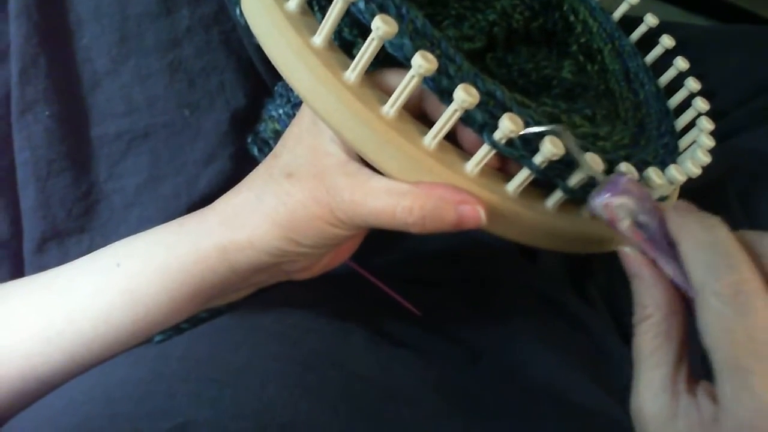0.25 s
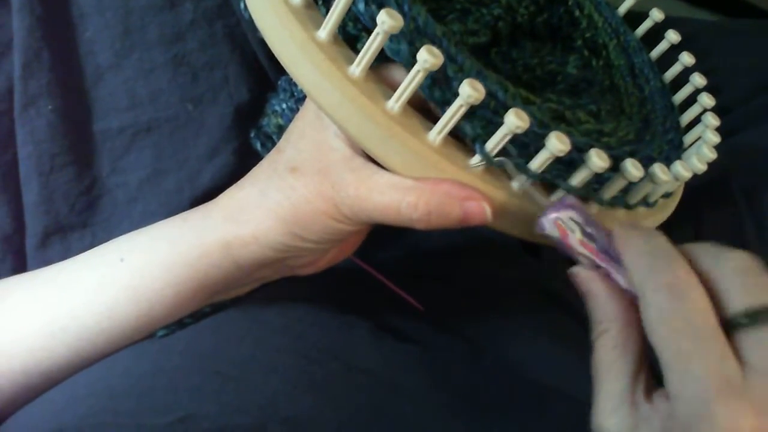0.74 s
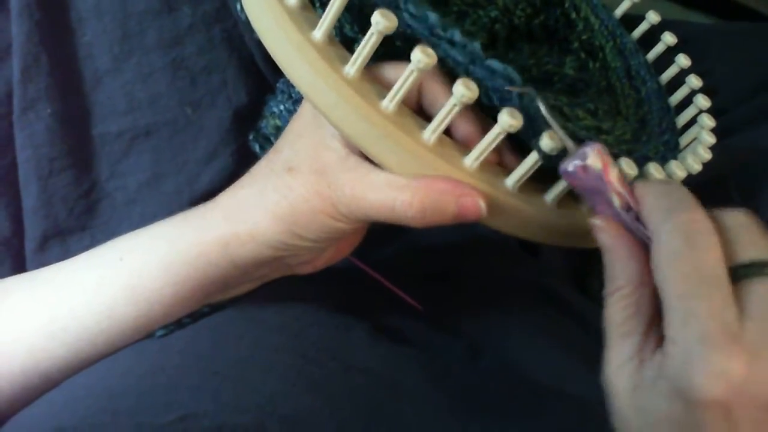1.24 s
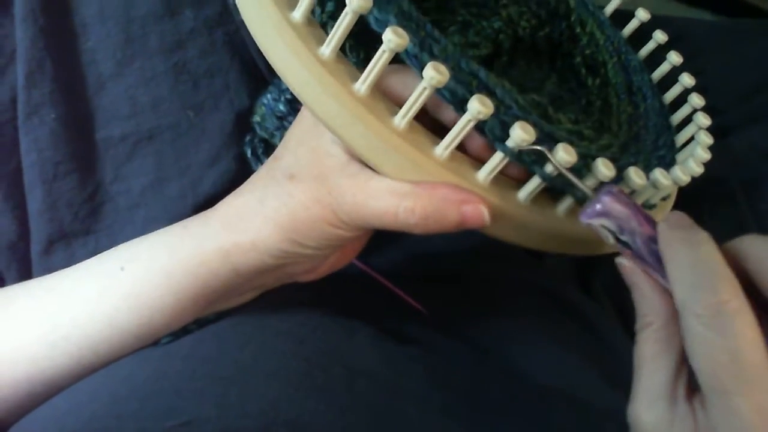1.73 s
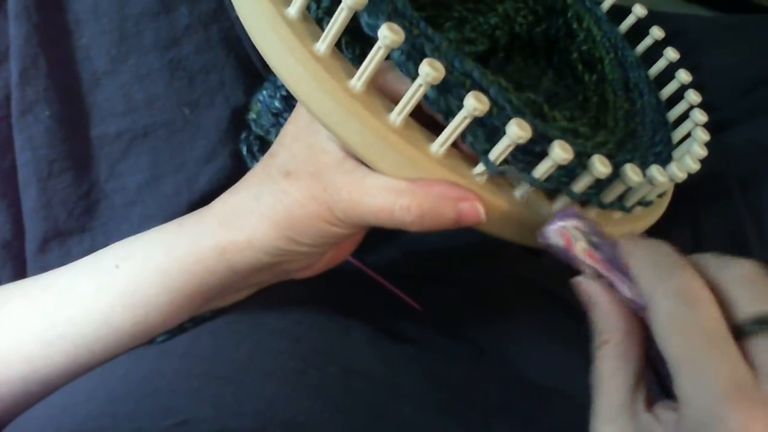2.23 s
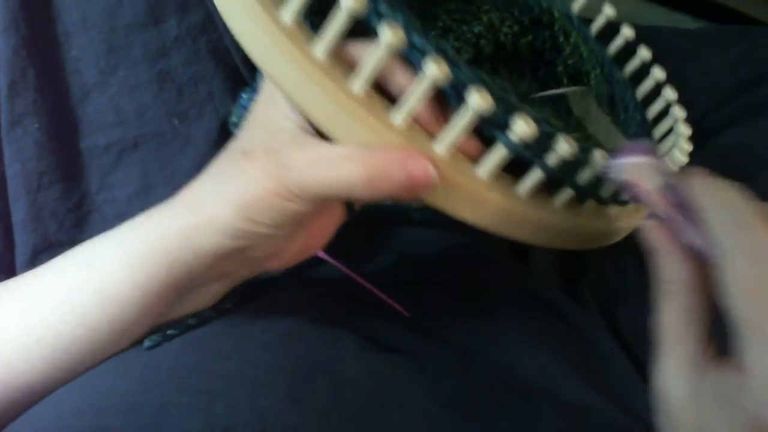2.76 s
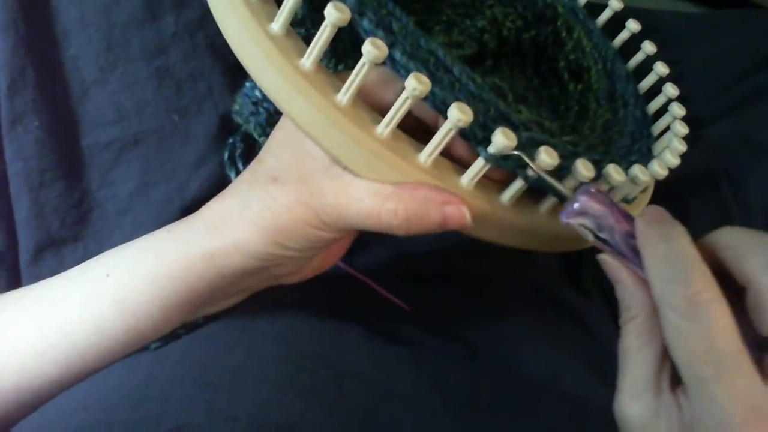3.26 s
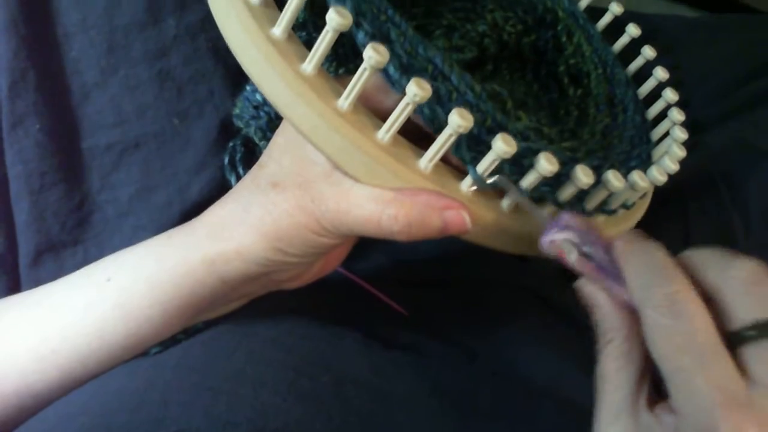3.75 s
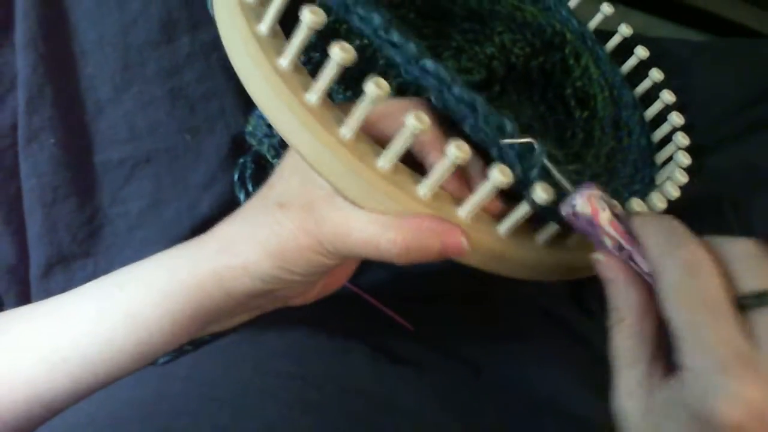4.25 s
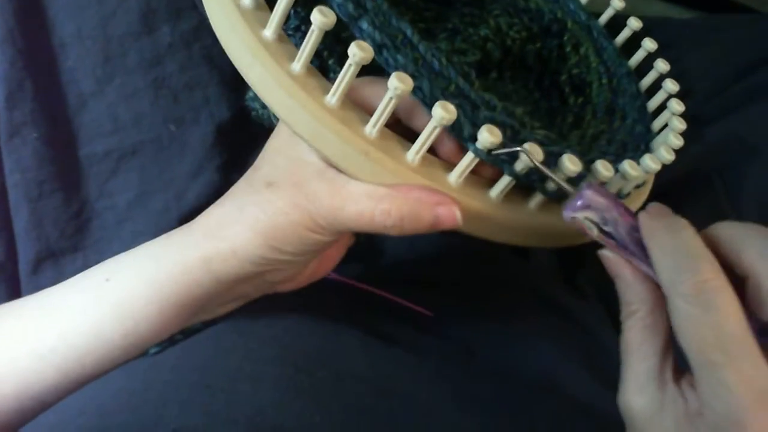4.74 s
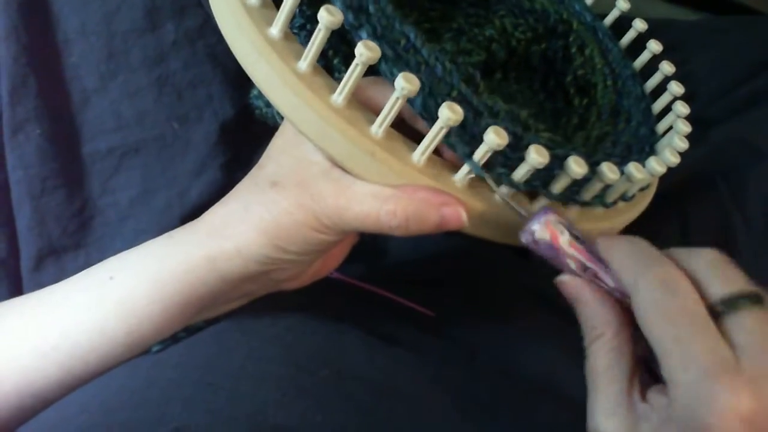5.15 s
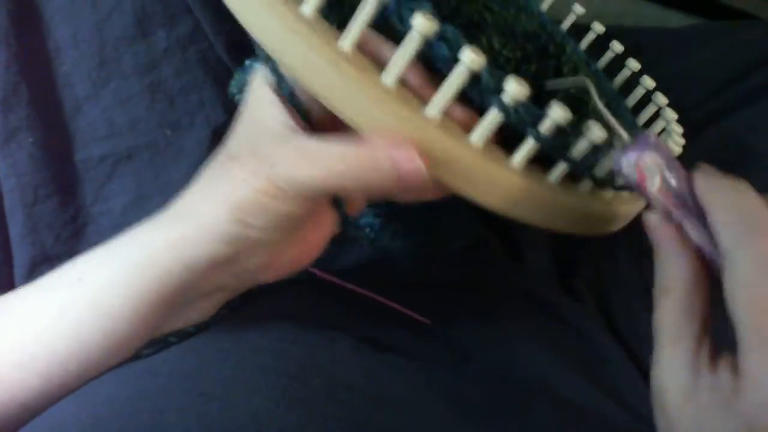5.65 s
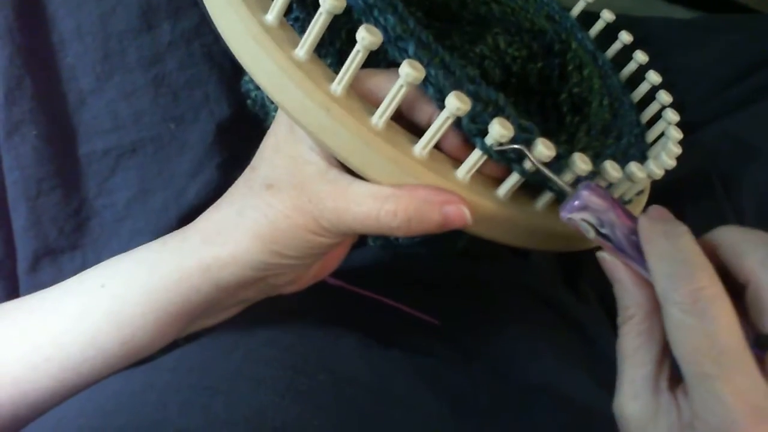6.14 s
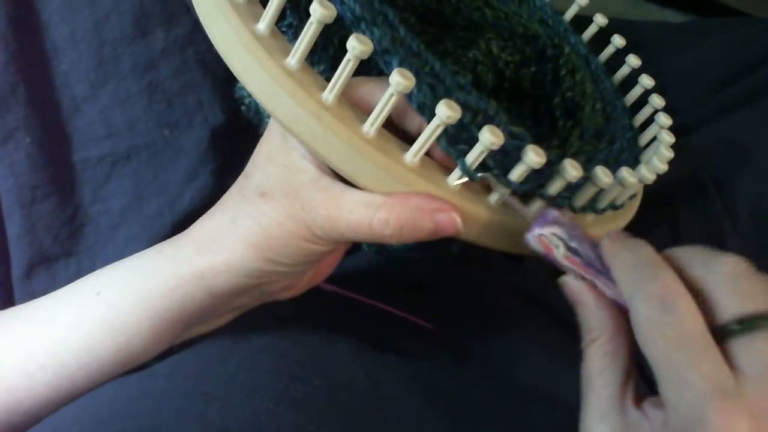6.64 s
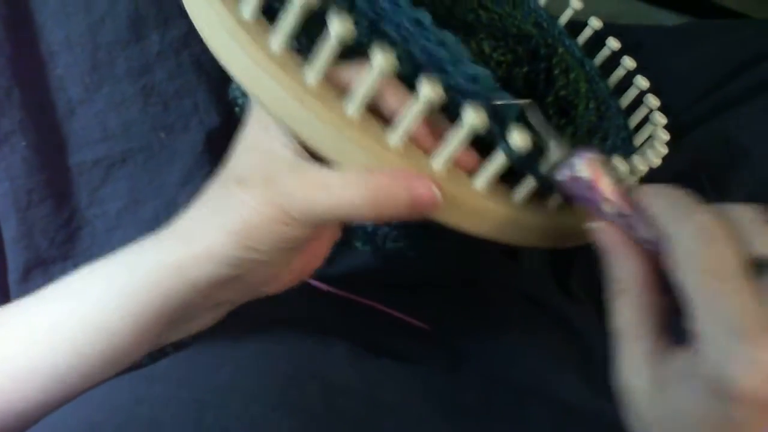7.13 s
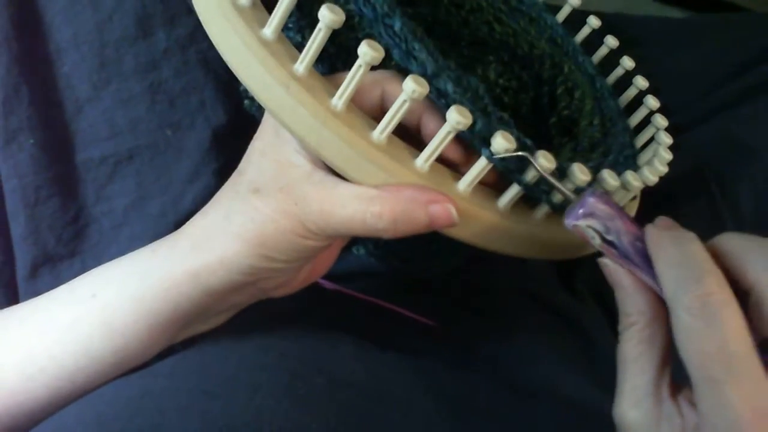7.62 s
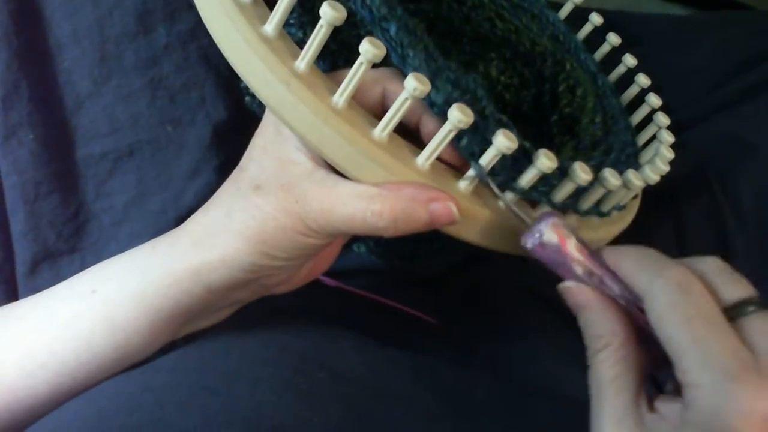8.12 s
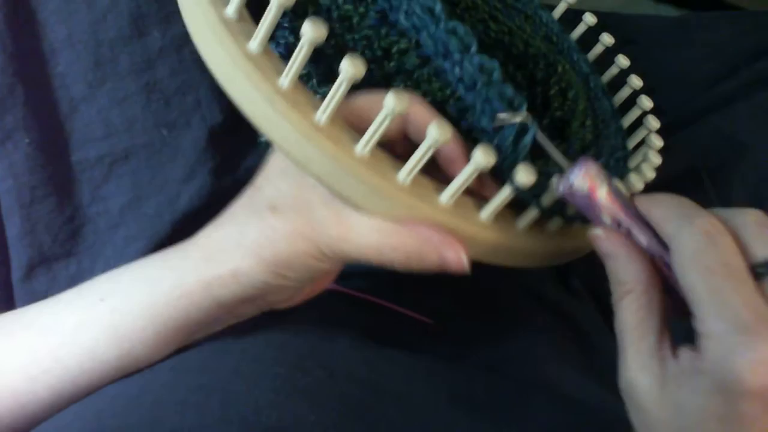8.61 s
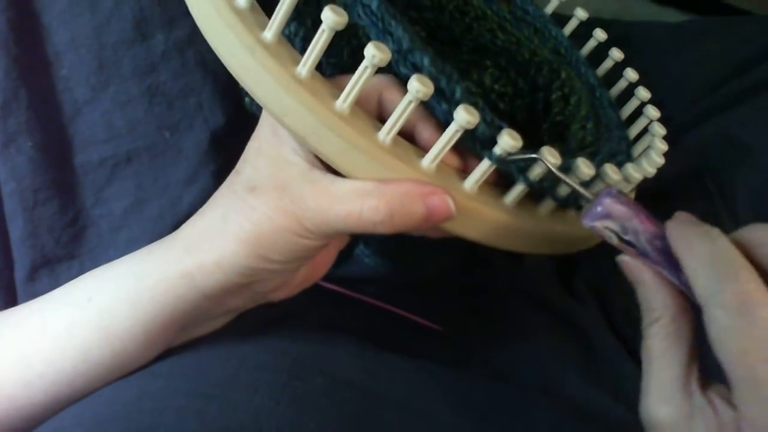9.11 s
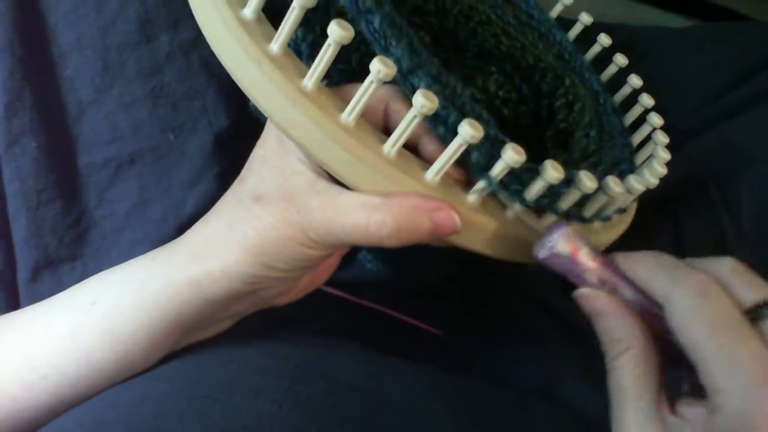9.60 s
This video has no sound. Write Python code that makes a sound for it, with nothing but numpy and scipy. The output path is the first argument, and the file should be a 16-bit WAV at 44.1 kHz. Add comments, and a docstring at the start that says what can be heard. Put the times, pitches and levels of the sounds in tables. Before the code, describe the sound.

A quiet, dry indoor space, heard close up with a small microphone. A thin faint motor whine wavers steadily over low mains-like hum, rumble and light hiss throughout. A metal hook works the pegs of a round loom: scratchy slides from 0.5 s with a sharp click at 0.7, then a tight cluster of clicks at 1.25-1.3 and soft fabric brushing until 1.5. Gentler scraping runs from 1.9 to 2.7, with brushing near 2.7-2.9. Small ticks follow, firmer at 3.55 and 3.77, more grit to 4.2, and a yarn swish at 4.3-4.5. Scrapes resume at 4.8-5.4, ending in a woody click at 5.43 and another brush. Light ticks lead to a hard knock at 7.0 and a rustle. Scratching at 7.7-8.4, brushing around 8.5, a strong click at 8.86, more rustle, then the loudest snap at 9.46 and final small scrapes.

```python
"""On a lap, close to a small microphone: a metal hook taps and scrapes the pegs of a round knitting loom.
Chattering blows and grainy strokes set hook, pegs and loom ring sounding; the room adds a short tail.
Knitted fabric brushes, as filtered noise, when each loop is lifted over; the loom frame knocks dully.
Behind it a small motor whines in drifting harmonics, over wavering mains hum, room rumble and hiss."""
import sys
import numpy as np
from scipy import signal
from scipy.fft import rfft, irfft, next_fast_len
from scipy.io import wavfile
from scipy.ndimage import uniform_filter1d

SR = 44100
rng = np.random.default_rng(int(sys.argv[2]) if len(sys.argv) > 2 else 0)


def transcribe(u):
    """Save the signal u as a 16-bit wav file named by the first command-line argument.

    u: samples, shape (n,) or (channels, n), limited to [-1, 1]; the rate is SR.
    q: integer samples, one column per channel.
    """
    v = np.clip(np.atleast_2d(u).T, -1, 1)
    q = np.round(v * 32767).astype(np.int16)
    wavfile.write(sys.argv[1], SR, q)


N = 435266  # length [samples]


def amp(db):
    """Decibels to gain."""
    return 10 ** (np.asarray(db) / 20)


def evened(x):
    """Scales to rms 1."""
    return x / np.sqrt(np.mean(x ** 2) + 1e-20)


def add(mix, s, sound):
    """Mixes a sound in at time s [s], cut off at the end of the mix."""
    part = mix[..., round(s * SR):][..., :sound.shape[-1]]
    part += sound[..., :part.shape[-1]]


def coloured(points):
    """Noise of rms 1, its spectrum drawn through (frequency [Hz], level [dB]) points."""
    f, db = np.transpose(points)
    size = next_fast_len(N)
    freqs = np.fft.rfftfreq(size, 1 / SR)
    shape = amp(np.interp(np.log(freqs + 1), np.log(f), db))
    noise = irfft(rfft(rng.standard_normal(size)) * shape, size)
    return evened(noise[:N])


def wander(corner_hz):
    """Slow random curve of rms 1: noise through a one-pole low-pass, in steps of 64 samples."""
    steps = rng.standard_normal(N // 64 + 2)
    steps = signal.lfilter([1], [1, -np.exp(-2 * np.pi * corner_hz * 64 / SR)], steps)
    return evened(np.interp(np.arange(N) / 64, np.arange(len(steps)), steps))


def hook():
    """The close source: taps and slides of the hook, with a short decaying-noise room tail."""
    close = taps() + slides()
    t = np.arange(4000) / SR
    tail = rng.standard_normal(4000) * amp(-60 * t / 0.13) * (t > .003)  # 60 dB down in 0.13 s
    tail /= np.linalg.norm(tail)
    return close + amp(-15.0) * signal.oaconvolve(close, tail)[:N]


# Taps of the hook on the pegs:
# (time [s], place of contact, energy in the hook [dB], energy in the peg [dB], pitch of this peg [Hz])
HOOK_TAPS = [(.0634, "bend", -31.5, -28.5, 4070), (.449, "ring", -32, -40, 3930),
             (.5671, "shank", -24, -47, 4440), (0.616, "shank", -33, -34, 4340),
             (0.714, "flat", -11, -12.5, 4600), (1.0105, "tip", -18.5, -31, 4320),
             (1.2508, "flat", -10.5, -24, 4100), (1.253, "neck", -15, -29, 4130),
             (1.2571, "shank", -19, -30, 4100), (1.286, "neck", -16.5, -34, 4040),
             (1.296, "neck", -21, -42, 4040), (1.305, "neck", -25, -42, 4000),
             (1.478, "bend", -21.5, -43, 4500), (1.798, "tip", -33, -40, 4500),
             (1.842, "shank", -37, -42, 4200), (1.913, "flat", -39, -40, 4200),
             (1.933, "shank", -36, -42, 4200), (1.977, "ring", -27.5, -31, 4230),
             (2.467, "tip", -23, -43, 4630), (2.6868, "tip", -27.5, -37, 4580),
             (3.119, "ring", -41, -45, 4240), (3.1477, "neck", -30, -43, 4240),
             (3.2055, "flat", -28, -42, 4150), (3.37, "flat", -39, -41, 4080),
             (3.552, "flat", -15, -19, 4280), (3.7688, "shank", -16, -15.5, 4670),
             (3.7905, "neck", -21, -29, 3800), (4.0165, "tip", -31, -47, 4800),
             (4.161, "ring", -35, -24, 3850), (4.252, "neck", -18.5, -30, 4790),
             (4.76, "shank", -31, -42, 4200), (4.8599, "flat", -38, -38, 4360),
             (4.8978, "shank", -24, -33, 4340), (4.9706, "flat", -28, -39, 3980),
             (5.3014, "tip", -20.5, -46, 4630), (5.432, "knock", -18.5, -10.5, 4500),
             (5.9374, "flat", -25, -31, 4260), (5.9603, "shank", -23.5, -37, 4000),
             (6.247, "flat", -35, -35, 4200), (6.273, "ring", -38, -43, 4400),
             (6.4056, "shank", -27, -33.5, 3870), (6.497, "ring", -44, -41, 4270),
             (6.5436, "ring", -35, -36, 4500), (6.609, "shank", -35, -42, 4430),
             (6.6449, "neck", -33, -35, 4570), (6.9187, "tip", -29, -34, 4590),
             (7.0156, "knock", -12.5, -13, 4820), (7.0168, "knock", -31, -19.5, 3480),
             (7.539, "flat", -23, -29, 4600), (7.849, "ring", -28, -39, 3880),
             (7.877, "flat", -34, -35, 4700), (7.889, "shank", -35, -41, 3900),
             (8.2781, "tip", -32, -34, 3900), (8.3137, "tip", -21.5, -36, 4740),
             (8.665, "neck", -27, -38, 4440), (8.8591, "shank", -9.5, -12.5, 4520),
             (8.97, "bend", -35, -34, 4680), (9.2424, "shank", -27, -38, 4540),
             (9.333, "ring", -25, -34, 3820), (9.412, "flat", -32, -38, 4610),
             (9.4327, "ring", -33, -31, 4670), (9.4642, "flat", -4.5, -8.5, 4660),
             (9.499, "shank", -17, -27, 3980)]
# Where the hook lands decides what rings. Place of contact:
# (neck [dB], shank [dB], tip [dB], bend [dB], each over the hook energy; loom ring over peg [dB])
CONTACT_SHARES = {"flat": (-12, -1.5, -25, -6.5, -9.5), "shank": (-17, -1, -17, -13, -6.5),
                  "tip": (-41, -2, 2.5, -7, -5.5), "neck": (-0.5, -20, -8, -20, -3),
                  "bend": (-22, -8, -13, 2.5, -11), "ring": (-8, 0, -6, -5, 4),
                  "knock": (-5, -5, -19, -1.5, -2)}


def taps():
    """A sharp blow, then sparse random chatter for a few milliseconds, excites hook, peg and loom ring."""
    out, t = np.zeros(N), np.arange(300) / SR
    chances = rng.random((len(HOOK_TAPS), 2, 300))
    for (s, contact, hook_db, peg_db, peg_hz), (strikes, sizes) in zip(HOOK_TAPS, chances):
        chatter = (strikes < .1) * (2 * sizes - 1) * amp(-60 * t / 0.021)  # 60 dB down in 21 ms
        chatter[0] = 3.4  # the first blow
        chatter /= np.linalg.norm(chatter)
        *hook_shares_db, ring_db = CONTACT_SHARES[contact]
        wood_gains = amp([peg_db + ring_db, peg_db])
        hook_gains = amp(hook_db) * amp(hook_shares_db)
        response = np.r_[wood_gains, hook_gains] @ parts(peg_hz, cycles=3.7, peg_damping=0.81)
        add(out, s - .0002, np.convolve(chatter, response))
    return out


# Slides along a peg:
# (start time [s], length [s], friction level away from taps [dB], wood over hook [dB], tip over shank [dB])
PEG_SLIDES = [(.496, 0.035, -61.5, -14, -4), (.548, 0.019, -71, -10, -8), (0.569, 0.14, -61.5, -5, -9),
              (0.696, .02, -67, -5, 2), (0.715, 0.038, -54.5, -6, -6), (0.744, .043, -66, -14, 5),
              (0.805, 0.06, -62.5, -8, -12), (0.871, 0.085, -62.5, -11, -5), (.96, .045, -68, -10, -7),
              (1.003, 0.014, -55, -15, -8), (1.017, 0.028, -58, -11, 3), (1.205, 0.053, -70, -14, -4),
              (1.249, 0.04, -55, -10, -16), (1.284, .04, -65, -13, 2), (1.865, .03, -62, -11, -2),
              (1.958, 0.2, -64.5, -1.5, -3), (2.145, 0.11, -59.5, -12, 8), (2.264, 0.075, -59.5, -10, -1),
              (2.35, 0.15, -57, -12, -5), (2.499, .017, -61, -11, 0), (2.64, 0.071, -66, -17, -4),
              (3.12, 0.14, -73.5, -6.5, -5), (3.309, 0.094, -62.5, -5, -8), (3.549, 0.12, -67, -4, -6),
              (3.676, 0.092, -65, -5, -3), (3.76, .078, -67.5, -4.5, -1), (3.855, 0.077, -63, -9.5, -3),
              (3.921, 0.13, -61, -10, -1), (4.204, 0.053, -68, -15, 0), (4.8, 0.12, -70, -4, -8),
              (4.896, 0.076, -60, -6.5, -5), (4.97, 0.076, -59.5, -7, -5), (5.023, 0.056, -61, -13, 5),
              (5.056, 0.1, -62.5, -21, 12), (5.15, 0.056, -58, -6.5, 2), (5.204, 0.16, -61.5, -10, -3),
              (5.347, 0.018, -56, -12, -2), (5.438, 0.012, -68, 9, -14), (5.944, 0.028, -68.5, 0, -12),
              (6.17, .046, -64.5, -8, -6), (6.222, 0.064, -70, -7, -10), (6.446, 0.12, -75, -4, -10),
              (6.557, 0.053, -64.5, -2, -5), (6.605, 0.14, -73, -15, 7), (6.78, .067, -66.5, -8, 2),
              (6.86, .097, -63, -14, 3), (7.014, 0.035, -73, 14, -5), (7.133, .011, -49.5, -19, 8),
              (7.69, .03, -65, -15, 11), (7.79, 0.039, -64, -6, 2), (7.848, 0.16, -64.5, -5.5, -3),
              (7.978, 0.091, -58, -18, 5), (8.018, .066, -57.5, -24, 14), (8.124, 0.073, -60.5, -5.5, 1),
              (8.176, 0.21, -63.5, -11, 1), (8.618, 0.053, -66, -19, 2), (9.151, 0.032, -63.5, -8, -1),
              (9.312, 0.1, -69.5, -4, -1), (9.402, 0.065, -68.5, -5.5, -1), (9.466, 0.013, -62, 0, -10),
              (9.479, 0.021, -51, -4.5, -5), (9.583, 0.073, -64.5, -11, 1), (9.704, 0.039, -64, -1.5, -3),
              (9.729, .035, -53.5, -20, 7)]
PRESS_DB, PRESS_S = 12, 0.024  # friction swells towards a tap [dB] and fades after it [s]
RISE, FALL = 0.18, 0.27  # shares of a slide's length spent starting and ending
SKID_S = .006  # a slide starting this close to a tap [s] skids off it, with a 2 ms rise


def friction_grains():
    """Uneven grains for the six sounding parts, held in level for 40 samples at a time."""
    steps = N // 40 + 1
    # the contact point roams
    roam_db = 3.0 * evened(uniform_filter1d(rng.standard_normal((6, steps)), size=16))
    noise = rng.standard_normal((6, N))
    slip_db = 2.3 * np.minimum(rng.exponential(1, steps), 4)
    grains = noise * amp(roam_db + slip_db).repeat(40, axis=1)[:, :N]
    return evened(grains * amp(1.5 * wander(corner_hz=31.0)))  # the hand presses unevenly


def slides():
    """Stick and slip: grains under each stroke drive the same parts, on the peg tapped nearest in time."""
    grains = friction_grains()
    out, tap_s = np.zeros(N), np.array([tap[0] for tap in HOOK_TAPS])
    for s, length, db, wood_db, tip_db in PEG_SLIDES:
        t = np.arange(round(length * SR)) / SR
        nearest_tap_s = abs(s + t - tap_s[:, None]).min(0)
        press_db = PRESS_DB * np.exp(-nearest_tap_s / PRESS_S)
        rise_s = .002 if abs(s - tap_s).min() < SKID_S else RISE * length
        edges = np.clip(np.minimum(t / rise_s, (length - t) / (FALL * length)), 0, 1)
        stroke = amp(db + press_db) * np.sin(np.pi / 2 * edges) ** 2
        shank = 1 / np.sqrt(1 + amp(tip_db) ** 2)  # tip and shank share the hook's energy
        hook_gains = shank * amp([tip_db - 7.0, 0, tip_db, -11.])  # neck, shank, tip, bend
        gains = np.r_[amp([wood_db - .3, wood_db]), hook_gains]  # loom ring and peg come first
        force = gains[:, None] * stroke * grains[:, round(s * SR):][:, :len(t)]
        peg_hz = HOOK_TAPS[abs(tap_s - s - length / 2).argmin()][-1]
        responses = parts(peg_hz, cycles=3.35, peg_damping=2.2)  # the pressed peg is damped
        add(out, s, signal.fftconvolve(force, responses, axes=1).sum(0))
    return out


# Modes of the loom ring and of the hook's neck, shank, tip and bend, before parts() retunes and damps them:
# (frequency [Hz], width [Hz], level [dB])
RING_MODES = [(1890, 200, -17), (2285, 240, 6), (2494, 530, 15.5), (2773, 340, 5)]
NECK_MODES = [(5810, 280, 0)]
SHANK_MODES = [(6210, 160, -10.5), (6700, 770, 4), (8120, 690, -4)]
TIP_MODES = [(7460, 290, 10.8), (10770, 490, 4.3)]
BEND_MODES = [(8880, 1200, 16), (9560, 490, -2), (11300, 760, -0.5)]
# Modes of a peg, scaled so that the first takes the pitch of the peg played; width before damping:
# (frequency [Hz], width [Hz], level [dB])
PEG_MODES = [(4595, 290, 10), (3860, 120, -2.5), (5100, 690, -2)]


def parts(peg_hz, cycles, peg_damping):
    """Responses of ring, peg, neck, shank, tip and bend; each peg has its own pitch."""
    peg = body(PEG_MODES, peg_hz / PEG_MODES[0][0], cycles, peg_damping)
    others = (RING_MODES, NECK_MODES, SHANK_MODES, TIP_MODES, BEND_MODES)
    ring, *hook_parts = (body(modes, 0.98, cycles, 0.77) for modes in others)
    return np.array([ring, peg, *hook_parts])


def body(modes, pitch, cycles, damping):
    """Damped modes of joint energy 1; each builds up over a few cycles, and wide modes die sooner."""
    t, rings = np.arange(1024) / SR, 0
    for hz, width, db in modes:
        rise = np.sin(np.pi / 2 * np.minimum(t * hz / cycles, 1)) ** 2
        decay = np.exp(-np.pi * width * damping * t)
        tone = np.sin(2 * np.pi * hz * pitch * t)
        rings = rings + amp(db) * np.sqrt(width) * rise * decay * tone
    return rings / np.linalg.norm(rings)


# Fabric brushing over pegs and hand: (centre time [s], length [s], level [dB], brightness [0-1])
FABRIC_BRUSHES = [(1.305, 0.2, -54.5, 0.1), (1.446, 0.13, -57.5, 0.6), (2.728, 0.22, -56.5, 0),
                  (2.879, 0.16, -56.5, 0.74), (4.34, 0.25, -53.5, 0.14), (4.518, 0.15, -60, 0.7),
                  (5.534, 0.23, -53.5, 0.14), (5.686, 0.11, -56.5, 0.94), (7.17, 0.25, -57, 0.15),
                  (7.318, 0.13, -59, 0.7), (8.535, 0.16, -59.5, 0.7), (8.878, 0.27, -58.5, 0.2)]
# Spectra of the dull and the bright brushing, relative: (frequency [Hz], level [dB])
DULL_FIBRES = [(1500, -9.5), (2600, -12), (4500, -5.5), (6500, -9.5), (8500, -7.5), (11500, -11),
               (14000, -31)]
BRIGHT_FIBRES = [(1500, -24), (3000, -14), (5000, -8.5), (8000, -8), (10200, -3.5), (12500, -7),
                 (14500, -22)]


def fabric():
    """Soft fibre noise, dull and bright mixed by power, swells and fades with each brush."""
    dull, bright = np.zeros(N), np.zeros(N)
    for s, length, db, brightness in FABRIC_BRUSHES:
        swell = amp(db) * signal.windows.tukey(round(length * SR), .7)
        brightness = np.clip(brightness, 0, 1)
        add(dull, s - length / 2, swell * np.sqrt(1 - brightness))
        add(bright, s - length / 2, swell * np.sqrt(brightness))
    fibres = dull * coloured(DULL_FIBRES) + bright * coloured(BRIGHT_FIBRES)
    return fibres * amp(0.53 * wander(corner_hz=55.0))


# Dull knocks of the loom frame: (time [s], peak level before build-up and decay [dB], pitch [Hz])
FRAME_KNOCKS = [(1.021, -40.5, 299), (1.449, -38, 890), (2.467, -36.5, 494), (3.769, -40, 624),
                (5.309, -40, 427), (6.912, -36, 226), (7.0148, -22, 1570), (9.431, -35.5, 440),
                (9.743, -40.5, 390)]
# Modes of the frame, relative: (multiple of the knock's pitch, level [dB])
FRAME_MODES = [(1., 12.5), (1.28, 8), (2.15, 4.5), (2.5, 5)]


def frame_knocks():
    """Each knock rings the frame's modes, building up over one cycle and falling 60 dB per 27 cycles."""
    out, t = np.zeros(N), np.arange(2000) / SR
    for s, db, hz in FRAME_KNOCKS:
        rings = sum(amp(mode_db) * np.sin(2 * np.pi * hz * k * t) for k, mode_db in FRAME_MODES)
        rings = rings / abs(rings).max()
        rise = np.minimum(t * hz, 1) ** 2
        add(out, s, amp(db - 60 * t * hz / 27.0) * rise * rings)
    return out


# Motor whine, multiples 1 to 5 of its pitch, before the level flutter: (rms level [dB])
WHINE_LEVELS = [-63, -76, -79.5, -77, -82]
WHINE_HZ = 1536.4  # mean pitch [Hz]


def motor():
    """A whine with multiples; speed drifts and flutters, also once a shaft turn, which smears the upper ones."""
    t = np.arange(N) / SR
    drift_hz = 2.61 * wander(corner_hz=.8)
    flutter_hz = 8.3 * wander(corner_hz=20.3)
    phase = 2 * np.pi * np.cumsum(WHINE_HZ + drift_hz + flutter_hz) / SR
    shaft_hz = HUM_TONES[0][0]  # the lowest hum tone
    phase += 0.44 * np.sin(2 * np.pi * shaft_hz * t)
    whine = sum(amp(db) * np.cos((k + 1) * phase) for k, db in enumerate(WHINE_LEVELS))
    return np.sqrt(2) * whine * amp(0.28 * wander(corner_hz=30.0))


# Low tones of the background, around which pitch and level waver:
# (mean frequency [Hz], rms pitch waver [Hz], middle rms level [dB])
HUM_TONES = [(29.57, 2.26, -58), (47.2, 1.43, -57), (59.55, 0.57, -56.5), (119.6, 0.54, -57.5),
             (140.8, 1.43, -72), (240.3, 1.62, -78.5), (286.7, 1.75, -72.5), (345.3, 1.39, -74)]


def hum():
    """Low tones whose pitch and level waver, the more so the wider the tone."""
    out = np.zeros(N)
    for hz, width, db in HUM_TONES:
        phase = 2 * np.pi * np.cumsum(hz + width * wander(corner_hz=3.15)) / SR
        level = amp(db + 1.9 * width * wander(corner_hz=4.6))
        out += level * np.sqrt(2) * np.cos(phase)
    return out


# Spectrum of room rumble and microphone hiss, relative: (frequency [Hz], level per Hz [dB])
ROOM_SPECTRUM = [(8, -1.5), (35, -10), (70, -10), (300, -14), (420, -19), (600, -20), (780, -24.5),
                 (1000, -21), (1400, -28), (2400, -32.5), (5000, -35), (9000, -35.5), (15800, -35)]


def room():
    """Steady noise, strongest in the lows: room rumble and microphone hiss at -53.5 dB rms."""
    return amp(-53.5) * coloured(ROOM_SPECTRUM)


def scene():
    """All sources, from the hook in front to the room behind, as one channel."""
    return (hook() + fabric() + frame_knocks() + motor() + hum() + room())[None]


EDGE_HZ, OFFSET = 15850, -.0219  # upper band limit [Hz], constant offset [full scale]


def record(dry):
    """A steep low-pass limits the band, and the converter adds its constant offset."""
    edge = signal.firwin(1023, EDGE_HZ, window=("kaiser", 9), fs=SR)
    return signal.oaconvolve(dry, edge[None], "same") + OFFSET


dry = scene()
out = record(dry)
transcribe(out)
```